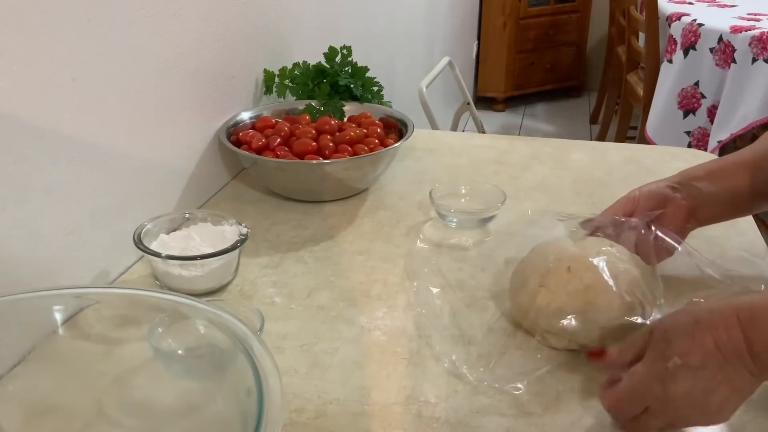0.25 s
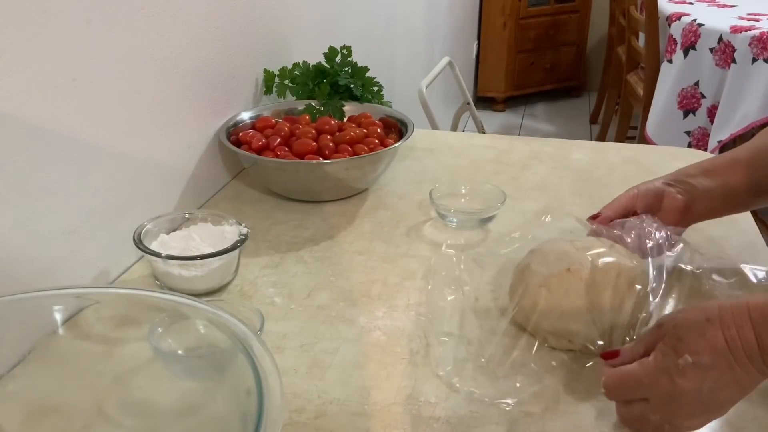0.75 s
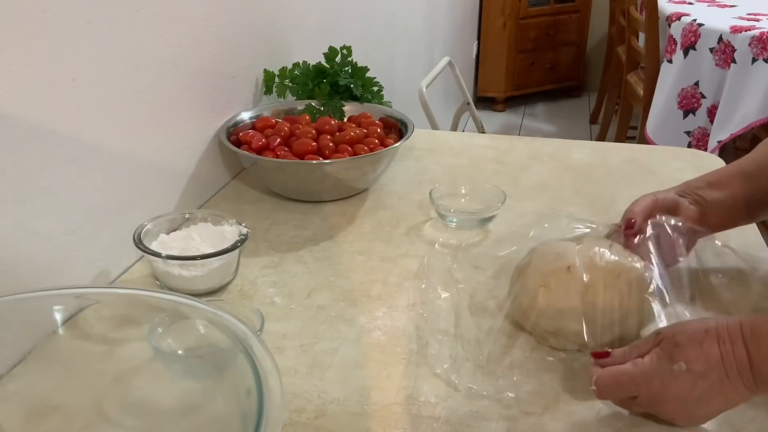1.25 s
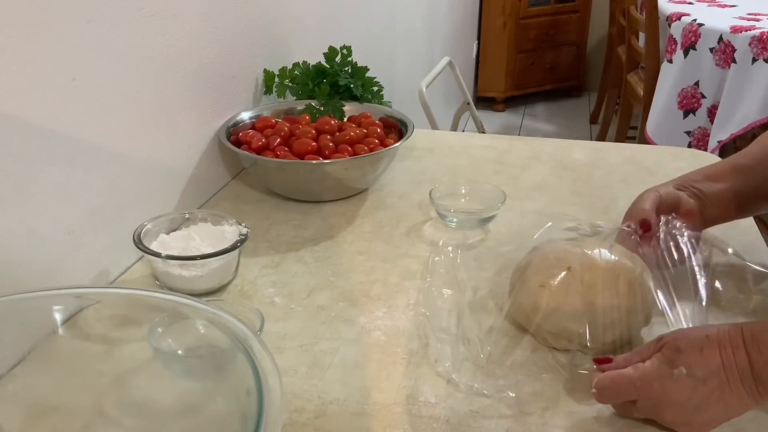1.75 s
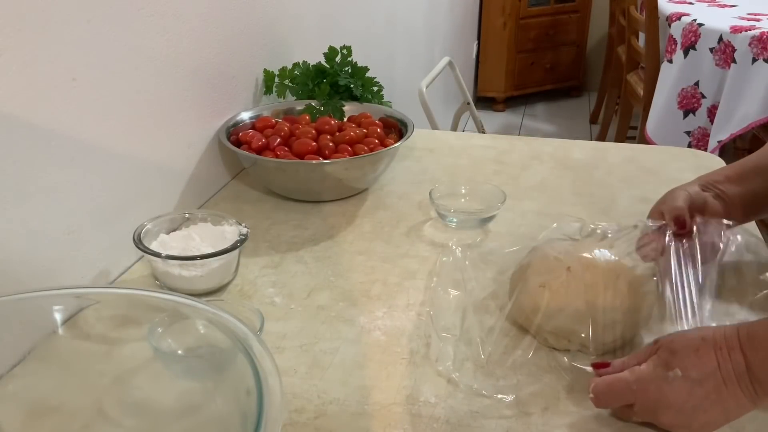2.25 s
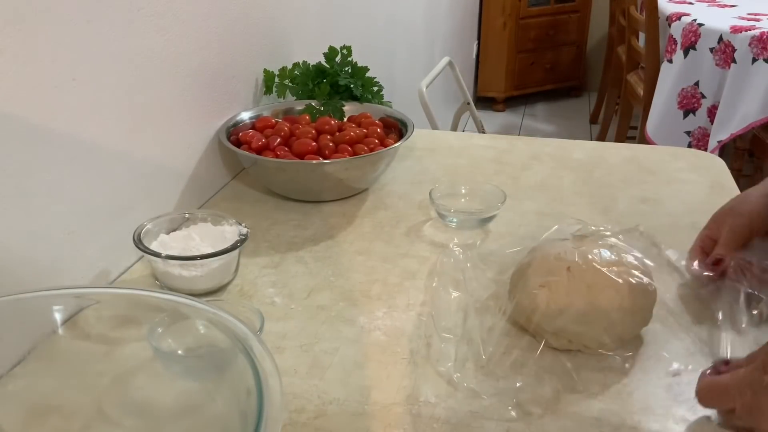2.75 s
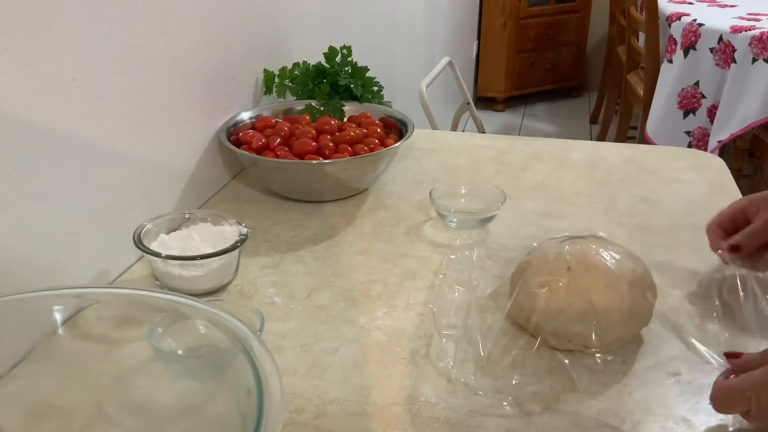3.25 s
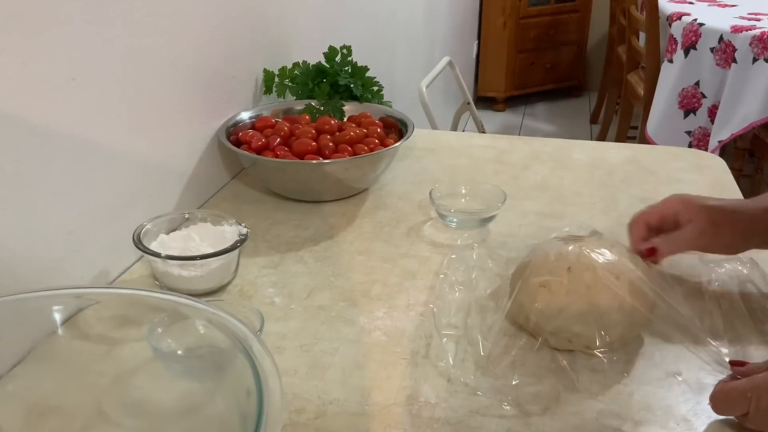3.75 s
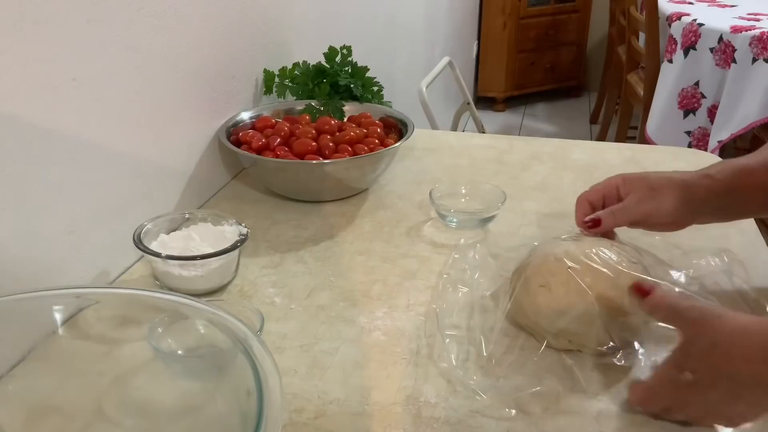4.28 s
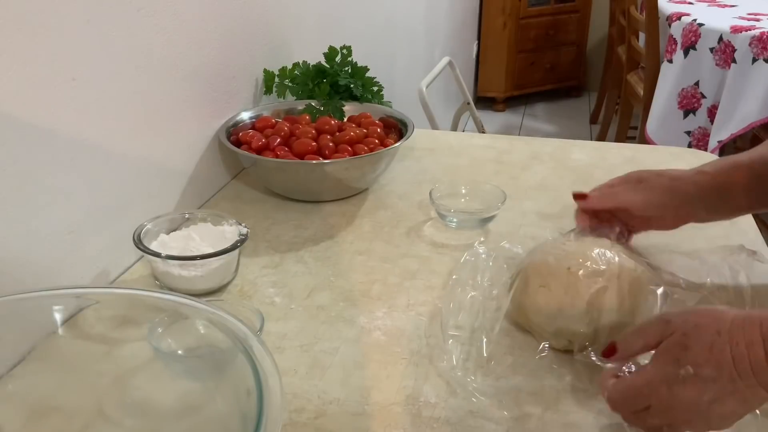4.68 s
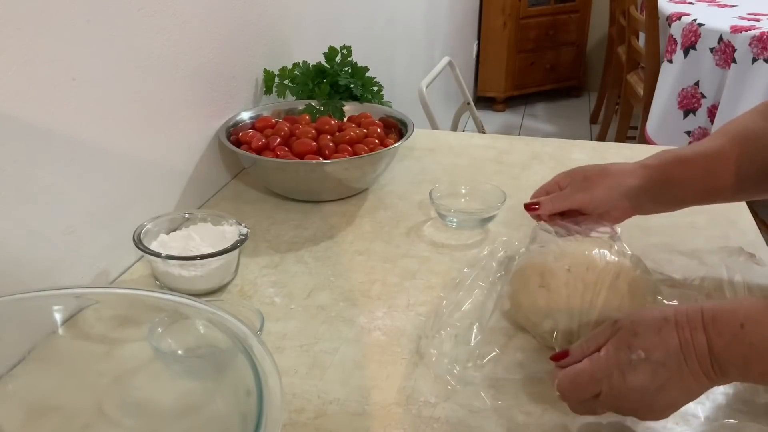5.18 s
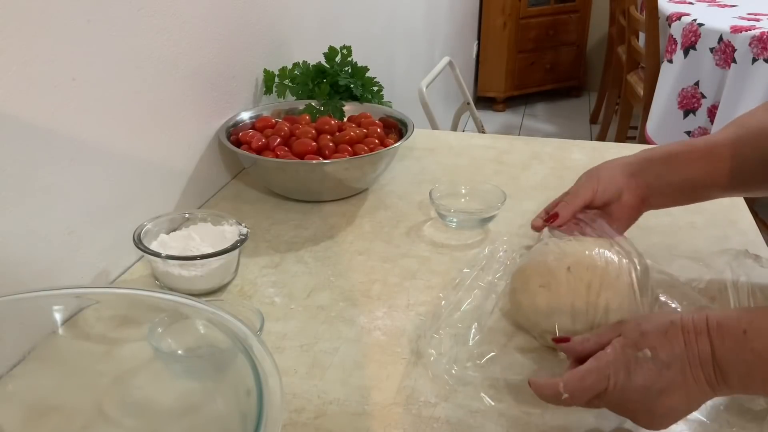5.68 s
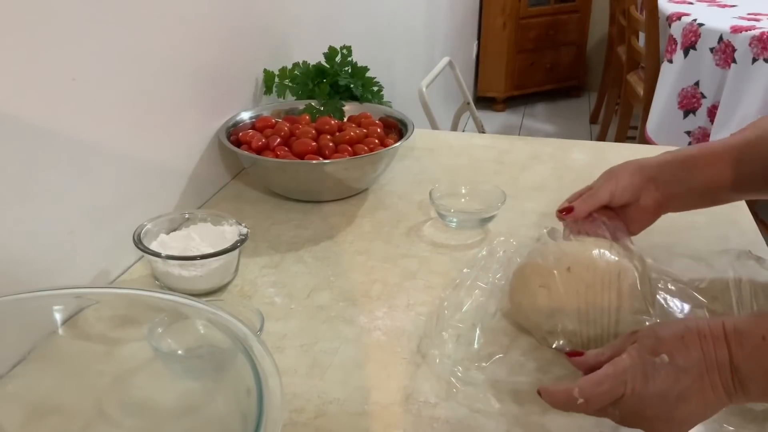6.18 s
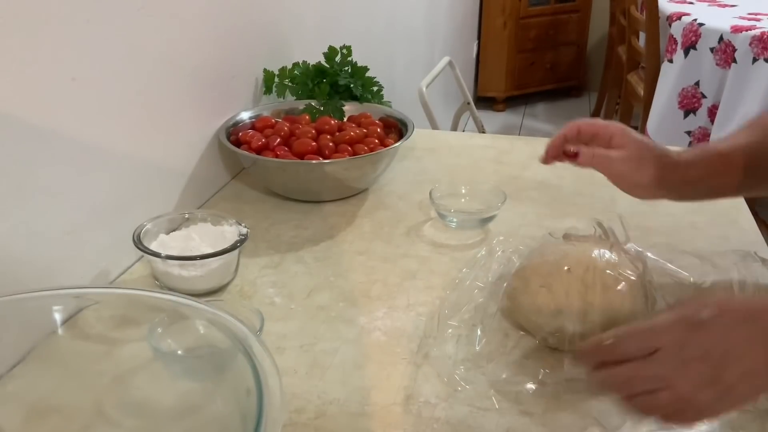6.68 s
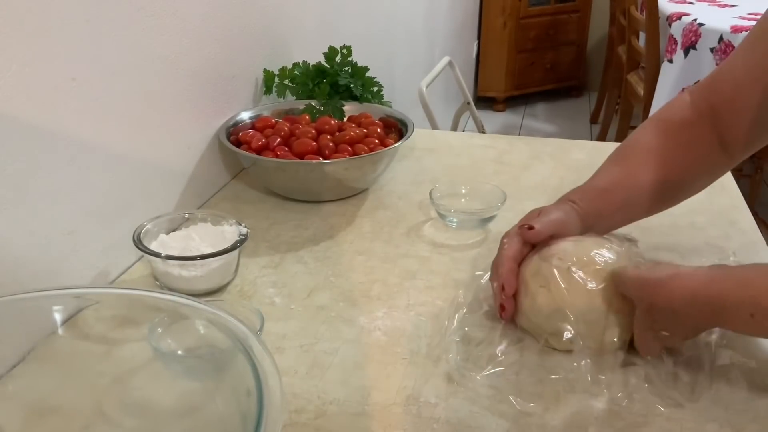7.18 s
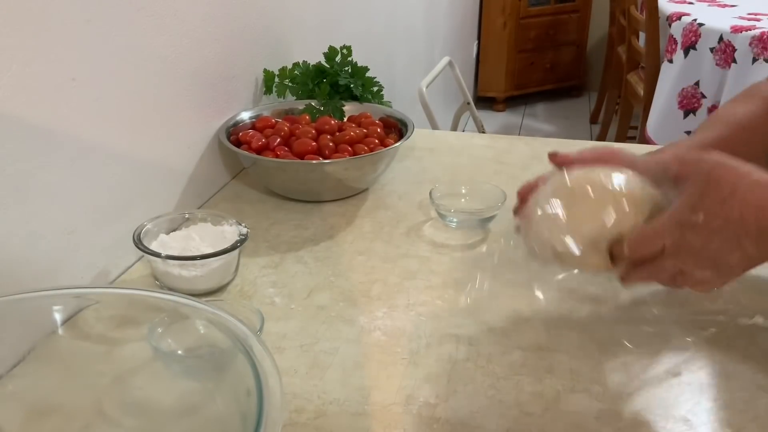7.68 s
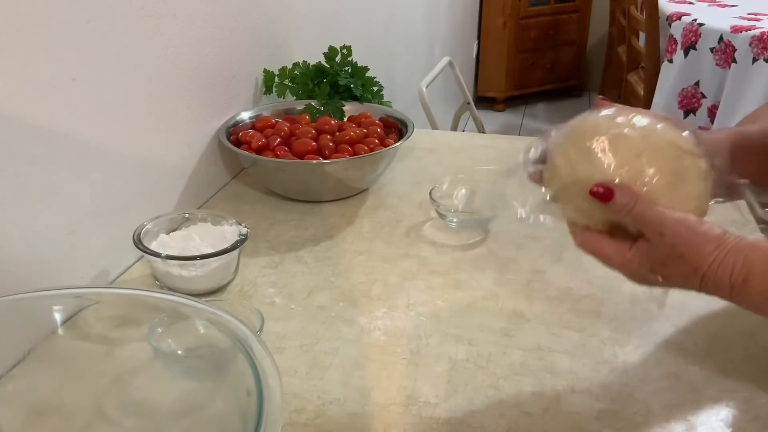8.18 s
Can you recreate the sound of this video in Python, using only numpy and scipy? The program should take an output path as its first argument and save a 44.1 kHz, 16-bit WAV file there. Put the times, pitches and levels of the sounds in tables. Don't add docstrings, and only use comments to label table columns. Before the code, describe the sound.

Hands stretch thin cling film over dough on a kitchen table. Bright crackles come in uneven tugs with soft, dull table knocks early on. The loudest sharp snaps come just before three seconds and soon after, then quieter tucking rustles and two brief crisp bursts near the end. A faint refrigerator hums in a small tiled room; close stereo phone pickup, film slightly to the right.

```python
import sys
import numpy as np
from scipy import signal
from scipy.fft import rfft, irfft, next_fast_len
from scipy.io import wavfile
from scipy.ndimage import uniform_filter1d, map_coordinates

SR = 44100
rng = np.random.default_rng(int(sys.argv[2]) if len(sys.argv) > 2 else 0)


def convert_level_to_amplitude(level_db):
    exponent = np.asarray(level_db, float) / 20
    return 10 ** exponent


def transcribe(signal):
    frames = np.atleast_2d(signal).T
    limited = np.clip(frames, -1, 1)
    pcm = np.round(limited * 32767).astype(np.int16)
    wavfile.write(sys.argv[1], SR, pcm)


N = 372159
TOP_HZ = 15750

# (frequency [Hz], likeness [0-1])
ALIKE_ROOM = [(600, 0.56), (1500, 0), (3000, 0.33), (8500, 0), (10500, 1), (15500, 1)]


def unit(x):
    return x / np.sqrt(np.mean(x ** 2) + 1e-20)


def along(points, hz):
    f, v = np.transpose(points)
    return np.interp(np.log(hz + 1), np.log(f + 1), v)


def wobble(rate):
    knots = rng.standard_normal(int(N * rate / SR) + 4)
    return map_coordinates(knots, [np.arange(N) * rate / SR])


def filtered(x, response):
    m = next_fast_len(N + 8192)
    return irfft(rfft(x, m) * response(np.fft.rfftfreq(m, 1 / SR)), m)[..., :N]


def coloured(x, spectrum):
    def gain(hz):
        in_band = (hz > spectrum[0][0] / 2) * (hz < TOP_HZ)
        return unit(convert_level_to_amplitude(along(spectrum, hz)) * in_band)
    return filtered(x, gain)


def spread(pair, alike):
    def mid_side(hz):
        turn = np.arccos(np.clip(along(alike, hz), -1, 1)) / 2
        return np.array([np.cos(turn), np.sin(turn)])
    mid, side = filtered(pair, mid_side)
    return np.array([mid + side, mid - side])


def fridge():
    # (frequency [Hz], density [dB])
    rumble_colour = [(13, -44), (22, -26.5), (49, -4.5), (92, -10.5), (118, -5.5), (237, -4), (267, 1),
                     (338, -2.5), (389, -4.5), (412, -5), (446, -10.5), (732, -17.5), (858, -19.5),
                     (1050, -16.5), (2500, -41), (3250, -83), (5500, -120)]
    # (frequency [Hz], likeness [0-1])
    alike = [(50, 1), (200, 0.79), (420, 0.9), (560, 0.011), (1000, 0.33), (2500, 0.6)]
    # (frequency [Hz], level [dB], unsteadiness [Hz])
    hum = [(44, -70, 8), (120, -62.5, 3), (209, -69, 10), (269, -66, 20), (331, -66, 14), (415, -61.5, 1.5)]
    # (frequency [Hz], density [dB])
    hiss = [(900, 12), (2000, -12.5), (5000, 0.5), (9000, -32), (13000, 0), (15600, 4.5)]
    t = np.arange(N) / SR
    noise = rng.standard_normal((2, N))
    motor = filtered(noise, lambda hz: convert_level_to_amplitude(along(rumble_colour, hz)) * (hz > 22) * (hz < 3000))
    rumble = unit(spread(motor, alike))
    lines = np.zeros(N)
    for hz, db, width in hum:
        level = convert_level_to_amplitude(db + 1 + 2.1 * wobble(width))
        lines += level * np.sin(2 * np.pi * hz * t + 0.89 * wobble(width))
    air = spread(coloured(rng.standard_normal((2, N)), hiss), ALIKE_ROOM)
    swell = convert_level_to_amplitude(0.43 * wobble(2.68))
    return convert_level_to_amplitude(-55.0) * swell * rumble + lines + convert_level_to_amplitude(-69.5) * air


def effort():
    # (peak time [s], crackle level [dB], rise [s], fall [s])
    tugs = [(.02, -51, 0.15, 0.17), (.35, -56.5, 0.063, 0.49), (.55, -44, 0.09, 0.15),
            (.61, -40.5, 0.11, 0.15), (.95, -61, 0.17, .3), (1.06, -49.5, 0.089, 0.49),
            (1.5, -50.5, 0.05, 1), (1.66, -44.5, 0.2, 0.16), (2.05, -42, 0.11, 0.18),
            (2.16, -39, 0.087, 0.19), (2.35, -46.5, 0.21, 0.062), (2.61, -47.5, 0.24, 0.32),
            (2.7, -34.5, .05, 0.039), (2.78, -32.5, 0.073, 0.15), (3.17, -43, 0.018, .1),
            (3.209, -35, 0.038, 0.19), (3.285, -37.5, 0.16, 0.027), (3.34, -50, .03, 0.19),
            (3.52, -78, .3, 0.075), (3.768, -34.5, 0.081, 0.13), (3.99, -50.5, 0.17, 0.18),
            (4.2, -63, 1, .5), (4.37, -47, 0.15, .3), (4.43, -35.5, 0.051, 0.067), (4.49, -47, .05, 0.055),
            (4.58, -53, .3, 0.027), (4.918, -52.5, 0.17, .3), (5.03, -41, 0.16, 0.044),
            (5.12, -59.5, .3, 0.27), (5.33, -60.5, 0.17, 0.19), (5.52, -57.5, 0.27, .4),
            (5.59, -46.5, 0.042, 0.19), (5.67, -36.5, 0.025, 0.022), (5.73, -51, 0.36, 0.22),
            (5.9, -52.5, .08, .4), (6.02, -48.5, 0.11, .14), (6.09, -45.5, .06, 0.11), (6.28, -72, .5, .5),
            (6.37, -55.5, 0.11, .04), (6.45, -69, .3, 0.22), (6.532, -58.5, 0.15, 0.049),
            (6.72, -64.5, 0.28, .5), (6.89, -48, 0.094, 0.74), (7.43, -48.5, 0.36, 0.44),
            (7.7, -49.5, 0.34, 0.82), (7.824, -32.5, 0.037, 0.027), (7.87, -56, 0.092, 0.08),
            (8.09, -60, .1, .2), (8.03, -68, .2, .2), (8.158, -33.5, 0.084, 0.072),
            (8.33, -41, 0.69, 0.069), (8.44, -45.5, 0.061, .1)]
    rest_db = -74
    t = np.arange(0, N + 64, 64) / SR
    power = np.full(len(t), convert_level_to_amplitude(rest_db) ** 2)
    for s, db, rise, fall in tugs:
        away = np.where(t < s, (s - t) / rise, (t - s) / fall)
        power += convert_level_to_amplitude(db - 20 * away) ** 2
    return np.interp(np.arange(N) / SR, t, np.sqrt(power))


def avalanche(snaps, after_db, rise, fall):
    kicks, t = np.zeros(N), np.arange(-SR // 8, SR // 8 + 1) / SR
    for s, db, _ in snaps:
        kicks[round(s * SR)] += convert_level_to_amplitude(db + after_db) ** 2
    shape = np.exp(-2 * np.where(t < 0, -t / rise, t / fall))
    return np.sqrt(np.abs(signal.oaconvolve(kicks, shape, mode="same")))


def swarm(per_second, size_db, clump_db):
    chance = per_second / SR * convert_level_to_amplitude(clump_db * wobble(60))
    sizes = convert_level_to_amplitude(size_db * np.minimum(rng.exponential(size=N), 4)) * rng.choice([-1, 1], size=N)
    clicks = (rng.random(N) < chance) * sizes
    power = np.abs(uniform_filter1d(clicks ** 2, size=SR // 16))
    return clicks / np.sqrt(power + 1e-3)


def rattled(clicks, t60, count):
    # (frequency [Hz], likeness [0-1])
    alike = [(600, 0.089), (1500, 0.96), (2300, 0.44), (5000, 0.87), (8500, 1), (10500, 0.85),
             (15500, 0.47)]
    t = np.arange(SR // 200) / SR
    patch = rng.integers(count, size=N)
    rattles = 0.32 * rng.standard_normal((count, 2, len(t))) * convert_level_to_amplitude(-60 * t / t60)
    rattles[:, :, 0] = 1, 0
    rattles /= np.linalg.norm(rattles, axis=2, keepdims=True)
    pair = np.zeros((2, N))
    for k in range(count):
        pair += signal.oaconvolve([clicks * (patch == k)], rattles[k], axes=1)[:, :N]
    return spread(pair, alike)


def film():
    # (time [s], peak [dB], body relative to
    # it [dB])
    crease_snaps = [(.03, -38, -14), (0.1697, -36.5, -21), (0.348, -37, -14), (.36, -35, -17),
                    (.513, -33, -26), (0.542, -21.4, -38), (.582, -22, -39), (0.6163, -37, -26),
                    (0.735, -38, -9), (0.9167, -42, -28), (1.0436, -34, -20), (1.12, -31, -21),
                    (1.1917, -30, -28), (1.253, -33, -13), (1.47, -37, -34), (1.4999, -37, -36),
                    (1.556, -31, -23), (1.683, -34, -8), (1.7882, -32.5, -12), (1.98, -28, -28),
                    (2.0315, -27, -27), (2.1397, -26, -28), (2.1635, -24, -30), (2.164, -30, -26),
                    (2.1765, -28, -27), (2.203, -29.5, -11), (2.212, -26, -31), (2.279, -31, -6),
                    (2.3415, -27, -36), (2.4595, -38, -31),
                    (2.6466, -31.5, -8), (2.6726, -21, -39), (2.7322, -34, -25), (2.7473, -22, -13),
                  (2.756, -22, -17), (2.759, -8, -21), (2.7624, -11, -27), (2.802, -17.5, -25),
                  (2.8382, -29.5, -3), (2.978, -42, -9), (3.0871, -46, -35), (3.157, -39, -27),
                  (3.18, -26, -8.5), (3.2041, -22, -24), (3.2105, -13, -17), (3.2133, -20, -13),
                  (3.2268, -29, -22), (3.269, -23, -31), (3.2749, -27, -10), (3.284, -14.5, -17),
                  (3.5136, -38, -26), (3.581, -44, -22), (3.685, -35, -11), (3.743, -24.5, -17),
                  (4.236, -38.5, -17), (4.3346, -28.5, -21), (4.4359, -26, -18), (4.4812, -17.5, -20.5),
                  (4.5866, -32, -34), (4.8925, -28, -25),
                    (5.0321, -35, -13), (5.3215, -38.5, -26), (5.4532, -39, -24), (5.5062, -29, -26),
                  (5.6231, -29, -20), (5.6571, -19.5, -18), (5.7092, -20.5, -18.5), (5.804, -38, -8),
                  (5.8873, -27.5, -15), (6.014, -39, -20), (6.0857, -25, -21), (6.1032, -38, -23),
                  (6.359, -36.5, -13), (6.4209, -38, -34), (6.4854, -40, -32), (6.518, -38, -25),
                  (6.888, -33, -16), (6.991, -35, -18), (7.1776, -39, -8), (7.2556, -41, -16),
                  (7.6273, -31.5, -35), (7.7052, -30, -26), (7.8127, -18, -18), (7.82, -18, -19),
                  (7.8286, -29, -31), (7.9348, -44, -33), (8.025, -58, -34), (8.0506, -37, -41),
                  (8.107, -37, -27), (8.1593, -18, -26)]
    # (time [s], level [dB])
    folds = [(0, -12), (.6, -9.5), (1.05, -8), (1.45, -11), (1.7, -5.5), (2.15, -8), (2.6, -7), (2.9, -8.5),
             (3.7, -8.5), (4.45, -10), (4.85, -12.5), (5.3, -6.5), (6, -15), (6.7, -1), (7.2, -13),
             (7.83, -11), (8.02, -19), (8.2, -11.5)]
    # (frequency [Hz], density [dB])
    crackle_colour = [(1500, -37.5), (3000, -14.5), (4500, -8), (6000, -9), (8000, -10), (9800, -5),
                      (11500, -1.5), (13200, 0.5), (15500, 2)]
    # (frequency [Hz], density [dB])
    body_colour = [(500, -9.5), (900, -7), (1500, -2.5), (2200, -6.5), (3000, -4.5), (5000, -17.5)]
    # (frequency [Hz], level [dB])
    snap_tilt = [(3000, -1.5), (8000, -0.5), (11000, 1.5)]
    strays_per_s, stray_db = 50, 17.5
    settle_db = -75

    pull, snaps = effort(), crease_snaps
    folds_db = np.interp(np.arange(N) / SR, *np.transpose(folds))
    clicks = swarm(per_second=2200, size_db=3.5, clump_db=5)
    lone = (rng.random(N) < strays_per_s / SR) * convert_level_to_amplitude(stray_db + 1.4 * rng.standard_normal(N))
    after = avalanche(snaps, after_db=-24.5, rise=0.0011, fall=0.003)

    bright = clicks * np.hypot(convert_level_to_amplitude(-3.5) * pull, after)
    sharp = lone * np.hypot(pull, convert_level_to_amplitude(settle_db))
    dull = clicks * np.hypot(convert_level_to_amplitude(folds_db - 6) * pull, convert_level_to_amplitude(-13.0) * after)
    dull += convert_level_to_amplitude(-27) * lone * pull
    for s, db, fold_db in snaps:
        sharp[round(s * SR)] = convert_level_to_amplitude(db + 8.5)
        dull[round(s * SR)] = convert_level_to_amplitude(db + fold_db + 11)

    sharp = filtered(rattled(sharp, t60=0.0034, count=7), lambda hz: convert_level_to_amplitude(along(snap_tilt, hz)))
    crackle = coloured(rattled(bright, t60=0.0036, count=7) + sharp, crackle_colour)
    body = coloured(rattled(dull, t60=0.0058, count=6), body_colour)
    return crackle + body


def table():
    # (time [s], peak [dB], upper modes relative [dB], legs relative [dB])
    knocks = [
        (.206, -36.5, -14.5, -15),
        (.805, -46.5, -8, -5),
        (1.349, -47, -11, -16),
        (1.765, -40.5, -20, -8),
        (2.324, -49.5, -9.5, 6),
        (7.437, -52, -12, 2),
        (7.82, -48, -5.5, 12),
    ]
    # (frequency [Hz], level [dB], t60 [s])
    modes = [(50, -26, 0.14), (136.2, -2.5, 0.14), (274, 0.5, 0.047), (453, 0, 0.048), (600, -7, 0.03),
             (832, -5.5, 0.036)]
    out, t = np.zeros(N + SR), np.arange(SR // 2) / SR
    for s, db, edge_db, legs_db in knocks:
        ring = np.zeros(len(t))
        for hz, level, t60 in modes:
            share_db = (hz > 400) * (edge_db + 10.5) + (hz < 80) * legs_db
            struck_hz = hz * rng.normal(1, 0.052)
            ring += convert_level_to_amplitude(level + share_db - 60 * t / t60) * np.sin(2 * np.pi * struck_hz * t)
        padded = 1 - np.exp(-t / 0.00051)
        out[round(s * SR):][:len(t)] += convert_level_to_amplitude(db + 2) * ring * padded
    return filtered(out[:N], lambda hz: (1j * hz / (45 + 1j * hz)) ** 2)


def kitchen(x):
    # (frequency [Hz], t60 [s])
    decay = [(300, 0.34), (1500, 0.33), (5000, 0.37), (10000, 0.24), (15000, 0.042)]
    out, step = np.zeros((2, N + SR)), SR // 4
    for i in range(0, N, step):
        hz, t, z = signal.stft(rng.standard_normal((2, SR // 2)), SR, nperseg=256)
        fading = convert_level_to_amplitude(-60 * t / along(decay, hz)[:, None])
        tail = signal.istft(z * fading, SR, nperseg=256)[1]
        wet = signal.fftconvolve(x[None, i:i + step], tail / np.linalg.norm(tail[0]), axes=1)
        out[:, i + 60:][:, :wet.shape[1]] += wet
    return spread(out[:, :N], ALIKE_ROOM)


def scene():
    sheet, knocks = film(), table()
    echoes = kitchen(sheet[0] + convert_level_to_amplitude(-1.0) * knocks)
    return sheet + knocks + convert_level_to_amplitude(-1.5) * echoes + fridge()


def band_limit(x):
    return signal.sosfilt(signal.butter(12, 16660, fs=SR, output="sos"), x)


def record(dry):
    # (frequency [Hz], lead [half turns])
    lead = [(0, 0), (400, -.1), (600, 0), (1150, 1), (3300, 5), (4250, 7), (7500, 13), (8750, 15),
            (10150, 17), (15250, 25), (17800, 29)]
    # (frequency [Hz], difference [dB])
    right = [(200, 0), (600, 1), (2200, 2.5), (3500, 0.5), (9000, 0), (12500, 0.1)]

    def microphones(hz):
        half = np.exp(.5j * np.pi * np.interp(hz, *np.transpose(lead)))
        balance = convert_level_to_amplitude([[-1], [1]] * along(right, hz) / 2)
        top_cut = np.where(hz < TOP_HZ, 1, convert_level_to_amplitude(-30))
        return np.array([1 / half, half]) * balance * top_cut
    return band_limit(filtered(dry, microphones))


dry = scene()
out = record(dry)
transcribe(out)
```